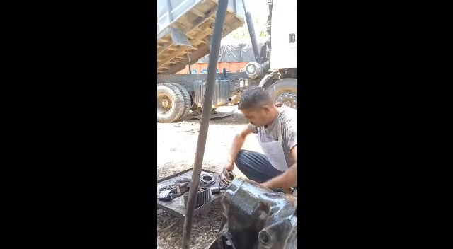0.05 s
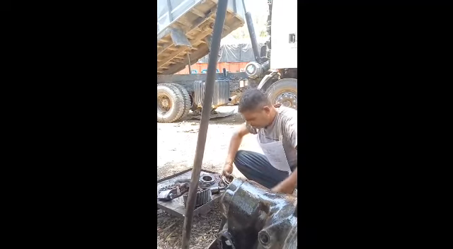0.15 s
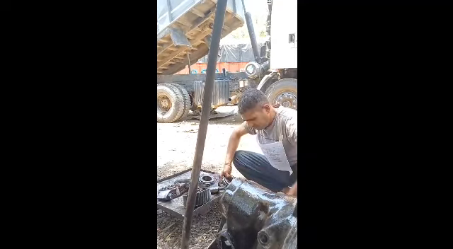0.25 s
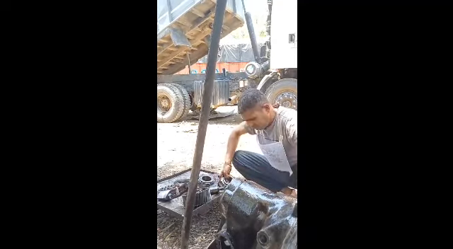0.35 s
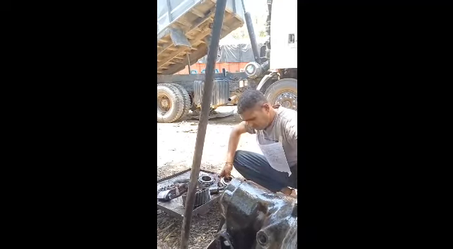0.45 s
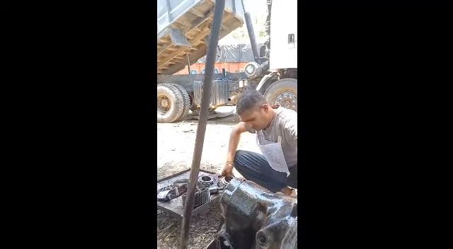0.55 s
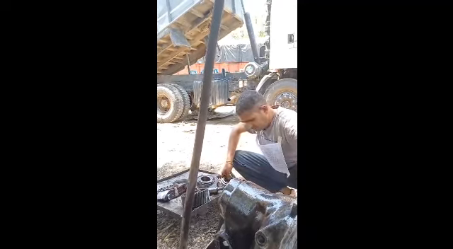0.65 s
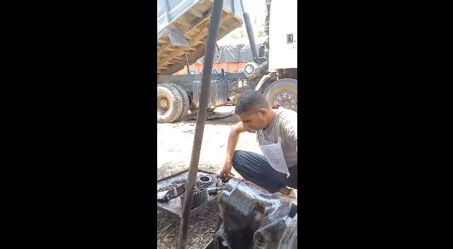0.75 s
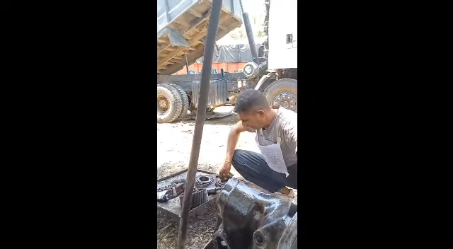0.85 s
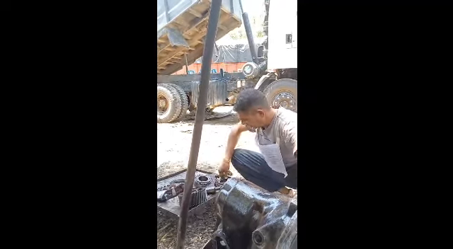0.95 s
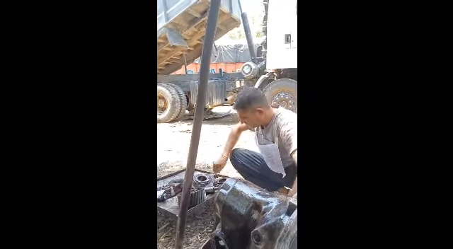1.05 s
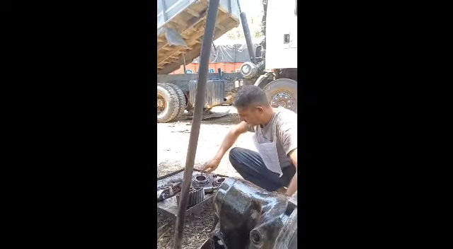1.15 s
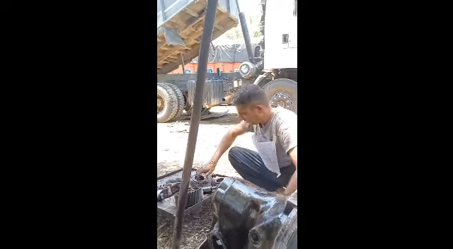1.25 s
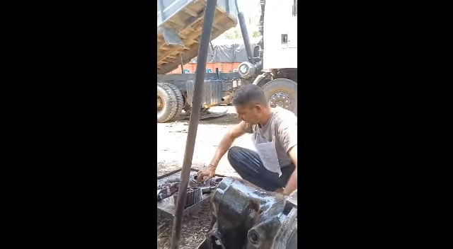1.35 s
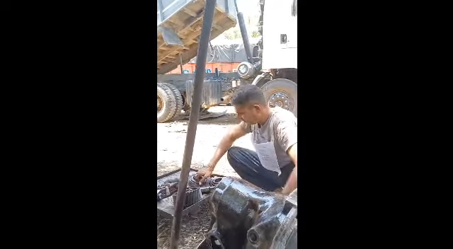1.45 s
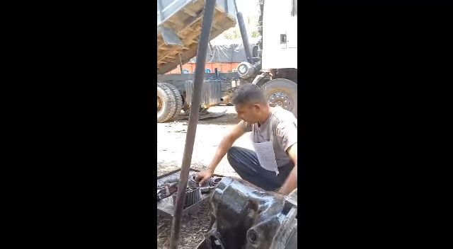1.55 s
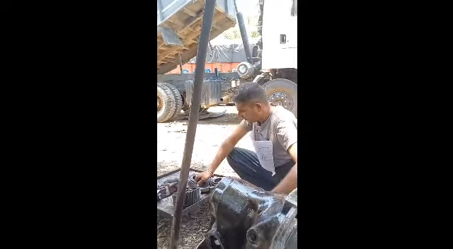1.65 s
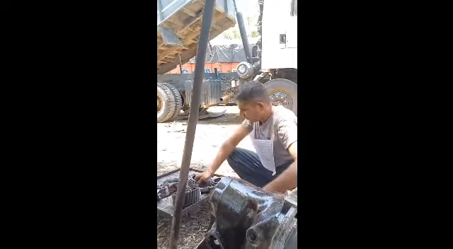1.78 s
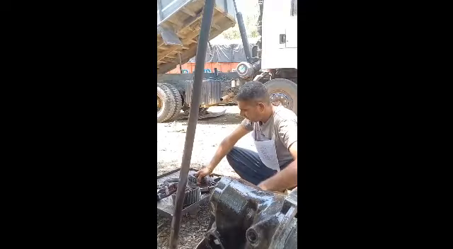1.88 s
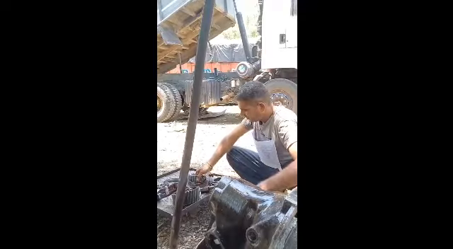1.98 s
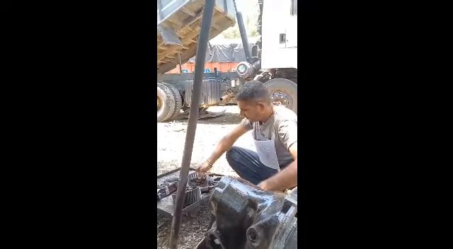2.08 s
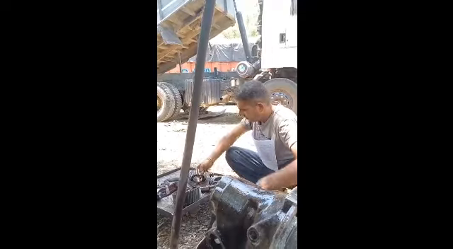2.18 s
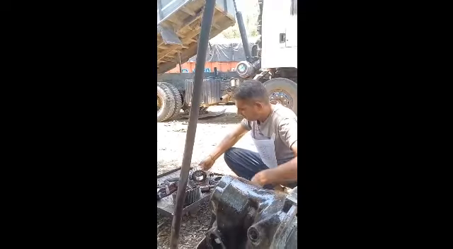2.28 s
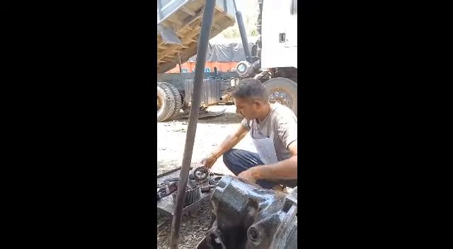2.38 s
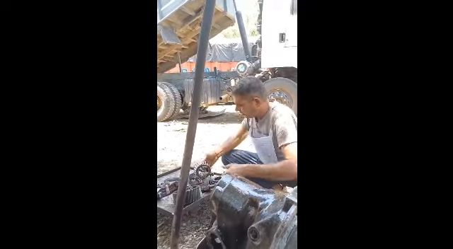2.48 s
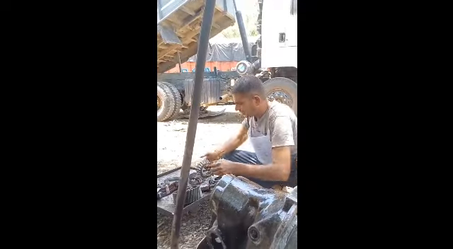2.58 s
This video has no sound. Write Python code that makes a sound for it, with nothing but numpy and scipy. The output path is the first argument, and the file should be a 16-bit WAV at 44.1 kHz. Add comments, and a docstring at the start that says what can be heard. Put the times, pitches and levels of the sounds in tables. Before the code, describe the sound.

Steel gears clank down twice onto a metal plate, scrape, then a bearing ring clinks softly

```python
"""A wavering low hum under faint open air is heard first, as a wandering sine and coloured noise.
Steel gears are then set down twice among loose parts on a steel plate: noise bursts and decaying modes.
During and between the landings a gear scrapes, as dense grains of friction that also drive the plate modes.
Last a bearing ring is picked up: it clinks in close mode pairs, drags, rubs and bumps its neighbours.
Narrow noise bands add short squeaks, a high steel zing at the first clank and a ring shimmer near the end."""
import sys
import numpy as np
from scipy import signal
from scipy.fft import rfft, irfft
from scipy.io import wavfile
from scipy.ndimage import uniform_filter1d

SR = 44100
rng = np.random.default_rng(int(sys.argv[2]) if len(sys.argv) > 2 else 0)


def dump(signal):
    """Clip the signal to [-1, 1] and save it as 16-bit WAV at the path in sys.argv[1]."""
    limited = np.clip(np.atleast_2d(signal).T, -1, 1)
    pcm = np.round(limited * 32767).astype(np.int16)
    wavfile.write(sys.argv[1], SR, pcm)


N = 114660  # samples
T = np.arange(N) / SR  # time in s
F = np.maximum(np.fft.rfftfreq(2 * N, 1 / SR), 1)  # frequency in Hz, of the zero-padded spectrum
ATTACK_S = 0.0013  # time constant of the onset of every blow
CRACK_HZ = 2690  # lower edge of the treble

# vibration modes of the steel plate: nominal f/Hz, relative level/dB, T60/s before the grip damps it
PLATE_MODES = [(229,-6.5,0.089),(466.2,3.5,0.13),(495,0,.13),(1097,-10,0.29),(1202,-13.5,0.23),(1270,-6.5,0.14),(1553,0.5,0.063),(1625,2,0.11),(2113,-2.5,0.1586),(2401,3.5,0.088),(2550,-6,0.16),(4785,0.5,0.044)]


def amp(db):
    """Level law: decibels become an amplitude ratio."""
    return 10 ** (np.asarray(db) / 20)


def unit(x):
    """Normalization: the signal is scaled to an rms value of 1."""
    return x / np.sqrt(np.mean(x ** 2))


def curve(rows):
    """Envelope: gain over time, linear in dB between (t/s, level/dB) points."""
    return amp(np.interp(T, *np.array(rows).T))


def shape(rows):
    """Spectral envelope: gain between (f/Hz, level/dB) points on a logarithmic frequency axis."""
    hz, db = np.array(rows).T
    return amp(np.interp(np.log(F), np.log(hz), db))


def resonances(rows):
    """Resonance: a body's gain is lifted around each of its modes."""
    lift_db, width_hz = -2.5, 41  # height of the added peak, width below 1500 Hz
    peaks = 0
    for row in rows:
        width = width_hz * max(1, row[0] / 1500)
        peaks = peaks + 1 / (1 + (2 * (F - row[0]) / width) ** 2)
    return 1 + amp(lift_db) * peaks


def colour(x, gain):
    """Minimum-phase filtering: the folded cepstrum of a gain yields a causal response."""
    cepstrum = irfft(np.log(gain + 1e-6))
    cepstrum[1:N] *= 2
    cepstrum[N + 1:] = 0
    response = np.exp(rfft(cepstrum))
    return irfft(rfft(x, 2 * N) * response)[..., :N]


def stereo(pair, rows, body=(), width=None):
    """Mid-side stereo: two incoherent signals, equally coloured, form a source of finite width."""
    # side relative to mid at the plate: f/Hz, level/dB
    plate_width = [(90,-16.5),(450,-11),(750,-11.5),(1300,0),(2600,-0.5),(5000,2.5),(14000,-1)]
    side_gain = shape(width or plate_width)
    gain = unit(shape(rows) * resonances(body)) / np.sqrt(1 + side_gain ** 2)
    mid = colour(pair[0], gain)
    side = colour(pair[1], gain * side_gain)
    return np.array([mid + side, mid - side])


def noise():
    """Incoherence: two independent white noises."""
    return rng.standard_normal((2, N))


def walk(rate):
    """Random modulation: values held at a rate in Hz, twice smoothed, with rms 1."""
    k = int(SR / rate)
    steps = np.repeat(rng.standard_normal(N // k + 1), k)[:N]
    return unit(uniform_filter1d(uniform_filter1d(steps, k), k))


def grains():
    """Stick-slip friction: dense uneven catches of steel on steel, each smeared by a short tail."""
    grains_per_s, scatter_db, smear_s = 3400, 5, 0.003
    hit = rng.random(N) < grains_per_s / SR
    level_db = scatter_db * np.minimum(rng.exponential(size=N), 4) + walk(45.7)
    size = hit * amp(level_db)
    power = signal.lfilter([1], [1, -np.exp(-1 / (smear_s * SR))], size ** 2)
    return unit(noise() * np.sqrt(power))


def modes(rows, start, chatter_depth=0.5):
    """Modal decay: a blow excites damped partials, the higher ones chattering against their support."""
    grip_s, grip_db_per_s = 0.058, 219  # a hand or a resting gear then shortens the ringing
    detune, phase_spread, chatter_s = 0.0038, 0.63, 0.0044  # detune is relative, phase in rad
    out, first, longest = np.zeros((2, N)), int(start * SR), SR // 3
    t = T[:min(N - first, longest)]
    size = max(int(chatter_s * SR), 1)
    held = amp(-grip_db_per_s * np.maximum(t - grip_s, 0)) * (1 - np.exp(-t / ATTACK_S))
    for hz, db, t60 in rows:
        shift, turn = rng.uniform(-1.07, 1, 2)
        height = min((hz / 1400) ** 2, 1.2)  # weight of the treble effects
        # opposite phases at left and right
        lag = np.array([[1], [-1]]) * np.sign(turn) * phase_spread * height
        rough = np.sqrt(size) * uniform_filter1d(rng.standard_normal((2, longest)), size)[:, :len(t)]
        chatter = 1 + chatter_depth * height * rough
        tone = np.sin(2 * np.pi * hz * (1 + detune * shift) * t + lag)
        out[:, first:first + len(t)] += chatter * amp(db - 60 * t / t60) * tone * held
    return out


def contacts(rows, t60, tail_db, spectrum, body):
    """Impact noise: each contact is a crack and a clattering tail, with its own bass, middle and treble."""
    thud_hz, rattle_t60_s = 788, 0.26
    clatter_per_s, clatter_db = 240, 2
    low = 1 / np.sqrt(1 + (F / thud_hz) ** 8)
    high = 1 / np.sqrt(1 + (CRACK_HZ / F) ** 8)
    middle = np.sqrt(np.maximum(1 - low ** 2 - high ** 2, 0))
    clatter = unit(amp(clatter_db * walk(clatter_per_s)))
    out = 0
    for k, band in enumerate([low, middle, high]):
        power = np.zeros(N)
        for row in rows:
            first = int(row[0] * SR)
            t = T[:min(N - first, SR // 3)]
            span = slice(first, first + len(t))
            crack = amp(-60 * t / t60)
            tail = clatter[span] * amp(tail_db - 60 * t / rattle_t60_s)
            onset = 1 - np.exp(-t / ATTACK_S)
            power[span] += (amp(row[k + 1]) * (crack + tail) * onset) ** 2
        out = out + irfft(rfft(noise() * np.sqrt(power), 2 * N) * band)[:, :N]
    return stereo(out, spectrum, body)


def yard():
    """Frequency modulation and filtered noise: a hum line wanders amid low noise, under faint air."""
    # envelope of the low hum: t/s, relative level/dB
    hum_level = [(0,-44.5),(.07,-59),(.12,-47),(.25,-40),(.41,-55),(.53,-51.5),(.62,-47.5),(.77,-54),(.93,-45.5),(1.04,-55),(1.1,-41.5),(1.2,-46.5),(1.4,-44),(1.62,-48),(1.85,-45),(2.03,-51),(2.2,-47.5),(2.45,-48),(2.6,-58.5)]
    # spectrum of the hum noise: f/Hz, relative level/dB
    hum_colour = [(20,-1),(35,-15),(55,-1),(85,4.5),(110,3),(165,-1.5),(220,-11.5),(320,-23),(600,-62),(2000,-77)]
    # spectrum of the outdoor air: f/Hz, relative level/dB
    air_colour = [(30,10),(300,8.5),(550,0.5),(1000,-2),(2300,-4.5),(3000,-10),(6000,-16.5),(9000,-25),(16000,-29)]
    # side relative to mid in the open air: f/Hz, level/dB
    air_width = [(30,8.5),(90,-17.5),(200,-5),(500,-2.5),(5000,0)]
    hum_hz, wander = 89.5, 0.034  # mean frequency, relative rms deviation
    line_db, noise_db, air_db = -9, -1.5, -61.5
    phase = 2 * np.pi * np.cumsum(hum_hz * (1 + wander * walk(14))) / SR
    line = np.sqrt(2) * np.sin(phase)
    hum = amp(noise_db) * stereo(noise(), hum_colour, width=air_width) + amp(line_db) * line
    air = stereo(noise(), air_colour, width=air_width)
    return hum * curve(hum_level) + amp(air_db) * air


def squeaks_and_zings():
    """Narrow-band noise: random drive of one resonance swells and fades as a squeak, zing or shimmer."""
    # squeaks, the first clank's zing (first row) and the ring's shimmer (last row):
    # start t/s, length/s, start f/Hz, end f/Hz, bandwidth/Hz, level/dB
    narrow_bands = [(.165,.07,4850,4900,600,-58),(1.193,0.15,545,539,25.2,-60),(1.377,0.14,3450,3450,25,-75.5),(1.57,.22,3480,3500,39.4,-73),(1.732,0.1,1490,1593,180,-64),(1.84,0.062,1520,1590,90,-53.5),(2.122,0.039,1860,1950,330,-51.5),(2.163,0.1,5040,4900,330,-64.5)]
    side_gain = 0.55
    out = 0
    for start, length, hz0, hz1, width, db in narrow_bands:
        u = np.clip((T - start) / length, 0, 1)
        drive = noise() + 1j * noise()
        # low-passed complex noise is shifted up to the gliding centre frequency
        band = signal.sosfilt(signal.butter(2, width / 2, fs=SR, output="sos"), drive)
        carrier = np.exp(2j * np.pi * np.cumsum(hz0 + (hz1 - hz0) * u) / SR)
        mid, side = unit(np.real(band * carrier))
        out = out + amp(db) * np.sin(np.pi * u) * (mid + side_gain * np.array([side, -side]))
    return out


def sliding():
    """Forced vibration: a gear scrapes along and its friction keeps the plate modes ringing softly."""
    # envelope of the gear sliding on the plate: t/s, level/dB
    slide_level = [(0,-66),(.16,-72),(.22,-44),(.36,-80),(.42,-55.5),(.52,-60),(.57,-45.5),(.61,-49.5),(.70,-49),(.78,-50),(.88,-38),(.96,-45.5),(1.0,-64),(1.06,-101.5),(2.6,-83)]
    # spectrum of the scrape: f/Hz, relative level/dB
    slide_colour = [(150,-42.5),(350,-15),(490,10.5),(700,-12.5),(1150,0),(1350,-10.5),(1600,-3),(2450,-1.5),(2900,-8.5),(4000,-16.5),(5000,-5),(9000,-11),(13000,-2.5),(16000,-8.5)]
    ring_db = -12.5
    drive = grains() * curve(slide_level)
    response = unit(modes(PLATE_MODES, 0)) / np.sqrt(N)
    ring = signal.fftconvolve(drive[:1], response, axes=1)[:, :N]
    return stereo(drive, slide_colour) + amp(ring_db) * ring


def bearing():
    """Beating and friction: the ring chimes in close mode pairs, bumps, drags and rubs."""
    # vibration modes of the ring: nominal f/Hz, relative level/dB, T60/s before the grip damps it
    ring_modes = [(1467,-1.5,0.2),(1524,6.5,0.06),(3960,-3,.26),(4010,-10.5,0.8),(7170,-6,0.04),(7200,-4,0.18),(7320,-5,0.4),(11060,-7.5,0.06),(12355,-13,0.25),(14900,-7,0.25)]
    # clinks of the ring: t/s, level/dB, added treble level/dB
    clinks = [(1.895,-45,4),(1.927,-52,-6),(1.943,-55,2),(2.164,-53,-10),(2.265,-48,-10)]
    # ring bumping its neighbours: t/s, then relative body level/dB, knock level/dB, tick level/dB
    bump_rows = [(1.895,-6.5,-16,1.5),(1.928,1.5,1,5),(1.938,-1.5,-19,-3),(1.977,2.5,-10,-8),(2.003,-6,-7,-17),(2.045,-7,-9.5,-5),(1.3,-32,-11,-6),(1.796,-20,-16,-21),(2.132,-32,-17,-15),(2.162,-37,3.5,-24),(2.167,-22,-7,-21),(2.238,-5,0,4),(2.266,-7.5,-27,0)]
    # spectrum of the bumps and the drag: f/Hz, relative level/dB
    ring_colour = [(100,-16.5),(260,6),(380,-5.5),(600,-3.5),(780,0.5),(1000,-2),(1500,0),(1950,-4),(2300,-11.5),(3200,-24.5),(4200,-21.5),(5900,-25.5),(7200,-20.5),(9000,-45.5),(16000,-32)]
    # envelope of the ring dragged over the parts: t/s, level/dB
    drag_level = [(0,-69),(1.12,-81),(1.21,-60.5),(1.27,-55),(1.305,-53),(1.37,-67.5),(1.68,-71.5),(1.76,-59),(1.9,-56.5),(1.935,-38.5),(1.99,-50),(2.06,-50),(2.1,-58),(2.18,-52.5),(2.28,-67),(2.38,-68.5),(2.6,-84.5)]
    # envelope of the fine rubbing of hand and metal: t/s, level/dB
    rub_level = [(0,-75),(1.15,-70.5),(1.24,-59),(1.39,-63),(1.44,-58),(1.5,-67),(1.7,-67),(1.9,-59.5),(2.06,-61.5),(2.12,-63),(2.29,-61),(2.42,-60),(2.55,-73),(2.6,-61)]
    # spectrum of the rubbing: f/Hz, relative level/dB
    rub_colour = [(500,9.5),(2000,-20),(3000,-1.5),(7000,6),(9000,1.5),(13000,5.5),(16000,1)]
    bump_db, bump_t60_s, bump_tail_db = -33.5, 0.031, -11
    stutter_per_s, stutter_db = 110, 2
    chime = 0
    for start, db, treble in clinks:
        struck = [(hz, level + db + treble * (hz > CRACK_HZ), t60) for hz, level, t60 in ring_modes]
        chime = chime + modes(struck, start, chatter_depth=1.3)
    bumps = amp(bump_db) * contacts(bump_rows, bump_t60_s, bump_tail_db, ring_colour, ring_modes)
    stutter = unit(amp(stutter_db * walk(stutter_per_s)))
    drag = stereo(grains() * stutter * curve(drag_level), ring_colour, ring_modes[:4])
    rub = stereo(unit(noise() + grains()) * curve(rub_level), rub_colour)
    return chime + bumps + drag + rub


def gears():
    """Impact excitation: gears land with a snap, rock and settle, and the plate rings at each blow."""
    # gear blows: t/s, then relative thud level/dB, clank level/dB, crack level/dB, plate ring level/dB
    blows = [(0.177,-20.5,-26,-46,-51),(0.221,-0.5,-2.5,-1,-15.5),(0.2266,-15,2,5.5,-2.5),(0.2341,1,-21,3.5,-11.5),(.273,-20,-5.5,-4.5,-2.5),(0.2846,-3.5,-8,-5.5,-25),
             (0.305,-8.5,-24,-12,-23),(.578,-29,-23.5,-20,-22.5),(0.8118,-5,-14,-17,-17),(0.8208,1.5,-11.5,-3.5,-6),(.842,2.5,-3.5,1,-30),(0.846,-0.5,-10,1,-17),(0.851,-7,-8,-8,-27),
             (.903,-12,-23,-18,-35),(0.934,-13.5,-26,-17.5,-21),(.943,-13,-25,-15,-36)]
    # spectrum of the plate with its loose parts: f/Hz, relative level/dB
    pile = [(60,-26.5),(130,-8.5),(230,-4.5),(330,-6),(410,-12),(490,-0.5),(700,-6.5),(1100,-0.5),(1380,-2.5),(1600,2),(2200,-4.5),(2900,-8),(4700,-11),(6700,-13.5),(9300,-20),(13000,-14.5),(16000,-21)]
    # small gear modes: nominal f/Hz, relative level/dB, T60/s before the grip; its knocks: t/s, level/dB
    small_modes = [(697,-0.5,0.1),(1910,2,0.063),(2286,7.5,0.045),(2395,1,0.057)]
    small_knocks = [(.8115,-32),(.934,-37)]
    # heavy gear, same columns
    heavy_modes = [(897,-3,0.055),(1030,1.5,0.038),(1265,-7,0.097),(1613,5.5,.06),(1707,1,0.032),(2138,-1,.06),(4740,-14,.2)]
    heavy_knocks = [(0.2254,-18),(0.284,-39.5)]
    # flat gear dropped on its face, same columns
    flat_modes = [(265.4,-7,0.13),(463,-0.5,0.08),(521.4,1,0.061),(1073,-6,0.077),(1920,-10,.16),(3330,-6.5,0.073)]
    flat_knocks = [(.8215,-31.5),(0.8449,-19.5)]
    # sharp snaps of steel on steel: t/s, level/dB
    snaps = [(0.2279,-4),(0.2293,-5.5),(0.851,-17)]
    blow_db, crack_t60_s, rattle_db = -15.5, 0.032, -11
    plate_db, snap_s = -31, 0.00022  # snap_s is a decay constant
    ring = sum(amp(row[4] + plate_db) * modes(PLATE_MODES, row[0]) for row in blows)
    knocking = [(small_modes, small_knocks), (heavy_modes, heavy_knocks), (flat_modes, flat_knocks)]
    for gear_modes, knocks in knocking:
        ring = ring + sum(amp(db) * modes(gear_modes, start) for start, db in knocks)
    snap = sum(amp(db) * (T >= start) * np.exp(-abs(T - start) / snap_s) for start, db in snaps)
    impacts = amp(blow_db) * contacts(blows, crack_t60_s, rattle_db, pile, PLATE_MODES)
    return impacts + ring + stereo(np.sign(noise()) * snap, pile)


def scene():
    """Interaural level difference: the work lies a little to the right, which shows above the bass."""
    right_db, shadow_hz = 2.5, 800  # right over left in the treble, half of it in dB at shadow_hz
    work = gears() + sliding() + bearing() + squeaks_and_zings()
    tilt = F ** 2 / (F ** 2 + shadow_hz ** 2)
    shadow = amp(np.array([[-1], [1]]) * right_db / 2 * tilt)
    return irfft(rfft(work, 2 * N) * shadow)[:, :N] + yard()


def record(dry):
    """Saturation and band limiting: the hardest peaks are rounded and the extreme treble is cut."""
    peak_limit, top_hz = .9, 15700
    rounded = peak_limit * np.tanh(dry / peak_limit)
    # order 10, 0.2 dB passband ripple, 70 dB stopband attenuation
    return signal.sosfilt(signal.ellip(10, .2, 70, top_hz, fs=SR, output="sos"), rounded)


dry = scene()
out = record(dry)
dump(out)
```